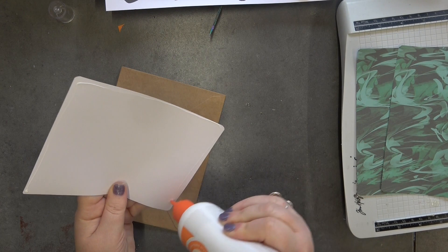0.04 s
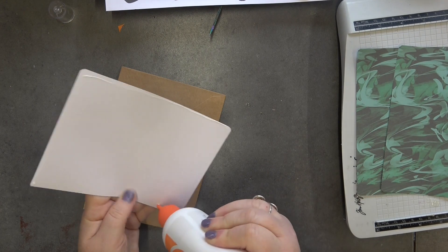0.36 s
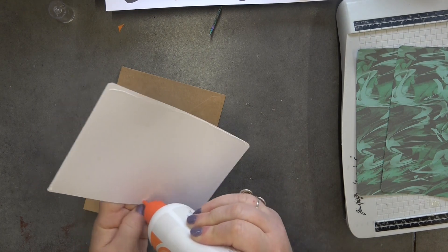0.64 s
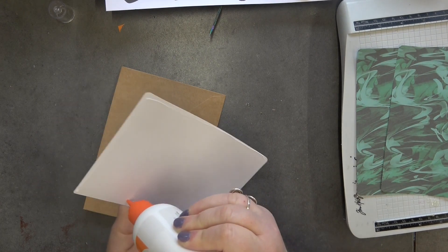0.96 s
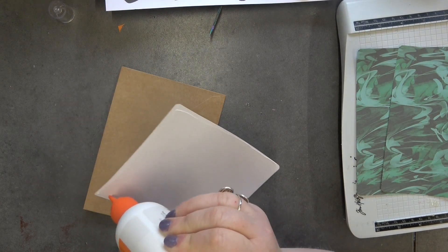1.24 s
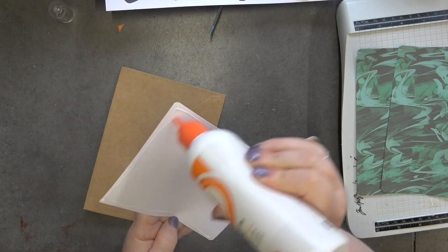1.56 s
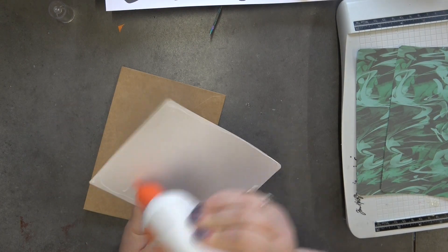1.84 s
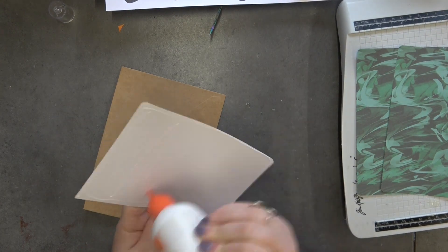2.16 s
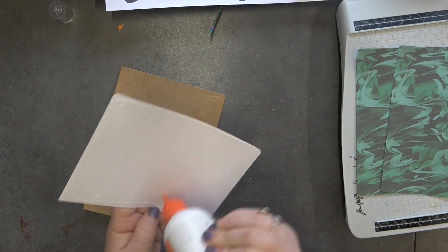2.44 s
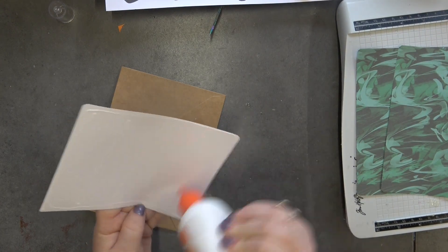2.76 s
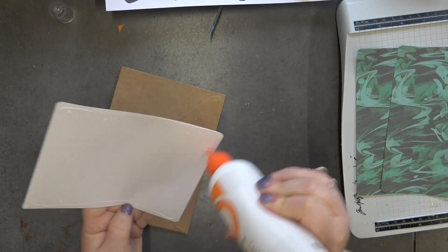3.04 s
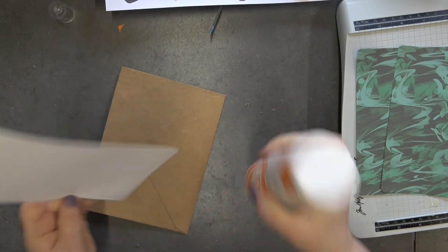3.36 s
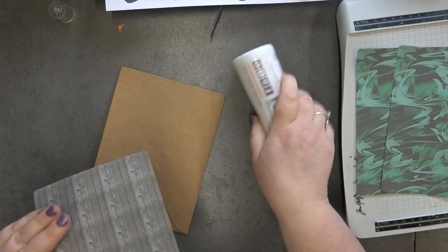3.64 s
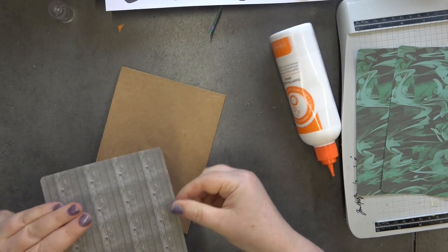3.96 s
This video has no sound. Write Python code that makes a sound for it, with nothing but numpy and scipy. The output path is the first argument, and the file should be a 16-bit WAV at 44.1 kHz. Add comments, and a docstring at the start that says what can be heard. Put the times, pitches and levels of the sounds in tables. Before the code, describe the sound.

A plastic glue bottle nozzle scrapes softly over card in short strokes, after some finger rustling and a sharp flick. The bottle then knocks down on a table and tips over, heard close in a small, quiet room.

```python
"""In a small, quiet room, fingers slide on a hand-held sheet of card and flick its edge as they turn it.
From about 1.4 s the nozzle of a plastic glue bottle rubs over the card in short strokes, close above a
craft table: stick-slip friction hisses and drives the resonances of the sheet. At 3.6 s the bottle
knocks down on the table and excites its modes, rocks, squeaks faintly and tips over with a second clunk."""
import sys
import numpy as np
from scipy import signal
from scipy.fft import rfft, irfft, next_fast_len
from scipy.io import wavfile
from scipy.ndimage import map_coordinates

SR = 44100
rng = np.random.default_rng(int(sys.argv[2]) if len(sys.argv) > 2 else 0)


def to_wav(sig):
    """Store sig (one row per channel, or 1-D mono) as 16-bit WAV at the path in sys.argv[1].

    Samples outside -1..1 are clipped; the rate is SR.
    """
    pcm = np.clip(np.atleast_2d(sig), -1, 1) * 32767
    pcm = np.round(pcm).astype(np.int16)
    wavfile.write(sys.argv[1], SR, pcm.T)  # frames by channels


N = 4 * SR
TOP_HZ = 16000  # upper band limit


def amp(db):
    """Amplitude ratio of a level: 20 dB to a factor of ten."""
    return 10 ** (np.asarray(db) / 20)


def unit(x):
    """Normalisation to rms 1."""
    return x / np.sqrt(np.mean(x ** 2) + 1e-20)


def along(points, hz):
    """Interpolation of (f/Hz, value) points on a logarithmic frequency axis."""
    f, values = np.transpose(points)
    return np.interp(np.log(hz + 1), np.log(f + 1), values)


def filtered(x, response):
    """Linear filtering: the spectrum of x times a frequency response."""
    n = x.shape[-1]
    padded = next_fast_len(n + SR // 4)
    return irfft(rfft(x, padded) * response(np.fft.rfftfreq(padded, 1 / SR)), padded)[..., :n]


def resonances(modes, f):
    """Modal sum of damped oscillators (f/Hz, bandwidth/Hz, level/dB), alternating in sign."""
    return sum((-1) ** k * amp(db) * 1j * f * width / (hz * hz - f * f + 1j * f * width)
               for k, (hz, width, db) in enumerate(modes))


def band(x, hz, width_hz):
    """Two equal resonators in cascade select a band of x; rms 1."""
    b, a = signal.iirpeak(min(hz, TOP_HZ), hz / width_hz, SR)
    return unit(signal.lfilter(b, a, signal.lfilter(b, a, x)))


def split(x, crossover_hz=4460):
    """Complementary filters: the low and high parts sum to x."""
    low = filtered(x, lambda f: 1 / (1 + (f / crossover_hz) ** 4))
    return low, x - low


def add(track, onset, x):
    """Superposition of x on the track from onset/s."""
    i = round(onset * SR)
    track[i:i + len(x)] += x[:max(0, N - i)]


def friction(response, slips_per_s, spread_db, hiss):
    """Stick-slip friction: random impulses of uneven size over smooth hiss, filtered; rms 1."""
    slips = (rng.random(N) < slips_per_s / SR) * rng.standard_normal(N)
    slips *= amp(spread_db * rng.standard_normal(N))
    return unit(filtered(unit(slips) + hiss * rng.standard_normal(N), response))


def speed(start, fastest, end):
    """Relative sliding speed: quarter sines from 0 to 1 and back."""
    ramp = np.interp(np.arange(N) / SR, [start, fastest, end], [0, 1, 0])
    return np.sin(np.pi / 2 * ramp)


def wandering(x, patch_hz=330.3, patch_s=0.05):
    """Coupling to the modes varies as the contact moves: bands swell and fade at random; rms 1."""
    hz, t, spectrum = signal.stft(x, SR, nperseg=512)
    grid = np.meshgrid(hz / patch_hz, t / patch_s, indexing="ij")
    field = map_coordinates(rng.standard_normal((160, 240)), grid, mode="mirror")
    depth_db = 3.3 / np.hypot(1, hz / 7000)[:, None]
    return unit(signal.istft(spectrum * amp(depth_db * field), nperseg=512)[1][:N])


def burst(response, t60, rise_s):
    """A damped transient: coloured noise rises, then decays by 60 dB in t60/s."""
    t = np.arange(SR // 5) / SR
    noise = unit(filtered(rng.standard_normal(len(t)), response))
    return noise * 1000 ** (-t / t60) * (1 - np.exp(-t / rise_s))


def placed(x, pan, wet_db, width):
    """Direct sound plus reverberation; a level difference between the channels gives direction."""
    # reverberation time of the room: f/Hz, T60/s
    decay = [(100, 0.36), (500, 0.12), (3000, 0.2), (12000, 0.13)]
    hz, t, spectrum = signal.stft(rng.standard_normal((2, SR // 3)), SR, nperseg=256)
    mid, side = signal.istft(spectrum * amp(-60 * t / along(decay, hz)[:, None]), SR, nperseg=256)[1]
    tail = np.array([mid + width * side, mid - width * side]) / np.linalg.norm(mid)
    delayed = np.pad(x, (SR // 200, 0))
    wet = signal.fftconvolve(delayed[None], tail, axes=1)[:, :N]
    return filtered(x + amp(wet_db) * wet, lambda f: amp(along(pan, f) * np.array([[0.5], [-0.5]])))


def room_tone():
    """Stationary air noise, highly correlated between the channels."""
    # background spectrum: f/Hz, relative level/dB
    air = [(22, 0), (50, 0), (130, -1), (170, -0.5), (205, -2), (260, -5.5), (360, 0), (425, -5.5),
           (495, -2), (560, -5.5), (780, -2), (1000, -5), (1080, 0.5), (1220, -11), (1290, -0.5),
           (1430, -14.5), (1650, -13.5), (2100, -18), (4000, -21.5), (6300, -19.5), (10000, -26),
           (13000, -24.5), (16000, -29)]
    mid, side = unit(filtered(rng.standard_normal((2, N)), lambda f: amp(along(air, f))))
    return amp(-54.5) * (mid + amp(-12) * np.array([side, -side]))


def squeaks():
    """Stick-slip drives two narrow resonances as the plastic bottle tips."""
    # slides of the plastic: start t/s, fastest t/s, end t/s, level/dB
    slides = [(3.807, 3.824, 3.832, -55), (3.836, 3.832, 3.856, -57)]
    # squeak resonances, applied twice: f/Hz, bandwidth/Hz, level/dB
    modes = [(2560, 170, 0.5), (3990, 110, -0.5)]
    slip = friction(lambda f: resonances(modes, f) ** 2, slips_per_s=540, spread_db=3, hiss=0.3)
    return slip * sum(amp(db) * speed(*times) for *times, db in slides)


def fingers():
    """Sliding friction of skin: a hiss on the card's face and a rasp on its edge grow with speed."""
    # glides on the face: start t/s, fastest t/s, end t/s, level/dB, sibilance level/dB, sibilance f/Hz
    glides = [(-.1, 0.013, 0.094, -59.5, -67, 5600), (0.253, .31, 0.48, -62, -67, 2940),
              (0.334, 0.406, 0.525, -53.5, -50.5, 5530), (0.445, 0.485, 0.517, -61, -53, 5300),
              (0.542, 0.604, 0.73, -63.5, -65, 2670), (3.14, 3.34, 3.597, -51.5, -67, 7750),
              (3.418, 3.52, 3.81, -55, -80, 12000)]
    # friction spectrum of the face: f/Hz, relative level/dB
    face = [(900, 6), (1700, 1), (2700, -0.5), (4000, -1), (6000, -4), (9000, -5), (11000, -10),
            (13500, -11), (16000, -26)]
    # drags on the edge: start t/s, fastest t/s, end t/s, level/dB, relative treble level/dB
    drags = [(0.34, 0.443, 0.59, -55, -10), (0.732, 0.78, 0.88, -41, 1.5), (0.823, 0.859, 0.96, -44.5, -3),
             (0.937, 0.97, 1.12, -47.5, -10), (1.085, 1.135, 1.23, -55.5, -4)]
    # friction spectrum of the edge: f/Hz, relative level/dB
    edge = [(180, -48), (300, -13.5), (774, 0), (1970, 0), (2170, -9.5), (2700, -6.5), (3240, -6),
            (6960, -15), (14500, -26), (16000, -52)]
    rub = wandering(friction(lambda f: amp(along(face, f)), slips_per_s=4000, spread_db=2.5, hiss=1.2))
    rasp = wandering(friction(lambda f: amp(along(edge, f)), slips_per_s=2500, spread_db=2.5, hiss=0.9))
    low, high = split(rasp)
    out = np.zeros(N)
    for *times, db, sibilance_db, hz in glides:
        sibilance = band(rng.standard_normal(N), hz, 0.3 * hz)
        out += speed(*times) * (amp(db) * rub + amp(sibilance_db) * sibilance)
    for *times, db, treble_db in drags:
        out += amp(db) * speed(*times) ** 1.1 * (low + amp(treble_db) * high)
    return out


def snaps():
    """Impulsive excitation of the card: a bright snap of the edge and a duller flap of the sheet."""
    # flicks and taps: t/s, snap level/dB, snap f/Hz, flap level/dB, flap f/Hz
    flicks = [(.51, -46, 3000, -39, 620), (0.744, -40.5, 8950, -63, 1510), (.7828, -35, 5550, -44, 1190),
              (.787, -20.5, 9000, -31, 1550), (.7955, -29.5, 4240, -51, 1300),
              (.834, -40.5, 4500, -35.5, 920), (0.9432, -46.5, 6000, -38, 1630),
              (0.986, -44.5, 6500, -61, 1500), (2.178, -41, 3000, -30.5, 417),
              (2.534, -45, 3500, -45, 1150), (3.1092, -46, 3500, -28, 930), (3.128, -54, 3553, -37, 1120),
              (3.212, -35, 3770, -28.5, 1002), (3.3116, -33, 8000, -30, 545),
              (3.603, -44.5, 3500, -24.5, 633), (3.857, -46.5, 6930, -44, 600)]
    out = np.zeros(N)
    for onset, snap_db, snap_hz, flap_db, flap_hz in flicks:
        edge, sheet = [(snap_hz, 3000, 0)], [(flap_hz, 0.45 * flap_hz, 0)]
        snap = burst(lambda f: resonances(edge, f) / (1 + (f / 11100) ** 6), t60=0.018, rise_s=0.00028)
        flap = burst(lambda f: resonances(sheet, f) ** 2, t60=0.027, rise_s=0.0013)
        add(out, onset, amp(snap_db) * snap + amp(flap_db) * flap)
    return out


def bottle():
    """Each impact gives a hollow thud, a plastic clack and free, damped vibration of table and bottle."""
    # impacts: t/s, thud level/dB, thud f/Hz, thud length/s,
    # ring level/dB, clack level/dB, clack cutoff f/Hz, clack rise/s
    impacts = [(3.6262, -2.5, 432, 0.00493, -33, -13, 1570, 0.0011),
               (3.6864, -11, 420, 0.0057, -31, -30.5, 2300, 0.00046),
               (3.708, -16.5, 240, 0.0088, -25.5, -16.5, 1760, 0.0011),
               (3.744, -18, 444, 0.00624, -31, -26.5, 2170, 0.0004),
               (3.923, -15, 673, 0.0119, -27.5, -15.5, 2500, 0.0038),
               (3.944, -9.5, 535, 0.0053, -19.5, -21, 700, 0.0016)]
    # modes of table and bottle: f/Hz, relative level/dB, T60/s
    modes = [(56.6, -5.5, 0.89), (120, -7.5, 0.19), (175, -5, 0.25), (215, -9, .1), (260, -7, .1),
             (318.6, 0, 0.12), (415, -12, 0.082), (508, -20, .09), (669, -6.5, 0.17), (774, 0, .12),
             (1146, -8, .09), (1347, -3, 0.069), (1646, -12, 0.099), (1833, -22, 0.056)]
    # clack spectrum: f/Hz, relative level/dB
    plastic = [(200, -2), (700, 2.5), (980, -0.5), (1350, 4), (1750, 1.5), (2100, -5.5), (2400, -3.5),
               (2900, -3), (3600, -7), (4900, -5), (6500, -7), (8000, -8), (9600, -9), (11000, -13.5),
               (13000, -14), (16000, -23)]
    # early reflections from near surfaces: delay/s, amplitude ratio
    walls = [(.0072, 0.44), (.0093, 0.48), (0.0117, 0.28), (0.0186, 0.27), (.0315, .15), (.0395, 0.13)]
    out, t = np.zeros(N), np.arange(SR // 2) / SR
    for onset, thud_db, thud_hz, length, ring_db, clack_db, clack_hz, rise_s in impacts:
        pulse = np.sin(np.pi * np.minimum(t / length, 1))
        add(out, onset, amp(thud_db) * pulse * np.cos(2 * np.pi * thud_hz * (t - length / 2)))
        draws = rng.standard_normal((len(modes), 2))
        ring = sum(amp(db + 2 * scatter - 60 * t / t60) * np.sin(2 * np.pi * (hz * t + phase))
                   for (hz, db, t60), (scatter, phase) in zip(modes, draws))
        add(out, onset, amp(ring_db - 3) * ring * (1 - np.exp(-t / 0.0014)))
        clack = burst(lambda f: amp(along(plastic, f)) / np.hypot(1, f / clack_hz), 0.039, rise_s)
        add(out, onset, amp(clack_db) * clack)

    def reflections(f):
        """Delayed copies from surfaces that return little above 1060 Hz."""
        return sum(gain * np.exp(-2j * np.pi * f * delay) for delay, gain in walls) / (1 + (f / 1060) ** 2)

    # keeps the knocks free of deep rumble below 69 Hz
    low_cut = signal.butter(2, 69, "high", fs=SR, output="sos")
    return signal.sosfilt(low_cut, out + filtered(out, reflections))


def nozzle():
    """Forced vibration: the tip slips over fibres; faster is louder, brighter and drives higher modes."""
    # strokes: start t/s, fastest t/s, end t/s, scrape level/dB, body level/dB,
    # treble level/dB relative to the scrape, ring level/dB, ring f/Hz (the mode excited most)
    strokes = [(1.442, 1.504, 1.5, -63.5, -59.5, 14.5, -77, 2970),
               (1.546, 1.584, 1.658, -47.5, -52.5, 5, -49, 1620),
               (1.657, 1.681, 1.91, -47, -49.5, 4.5, -60, 2080),
               (1.832, 1.981, 2.028, -41.5, -49.5, 1, -46, 1750),
               (2.029, 2.058, 2.2, -43.5, -49, 3.5, -53, 2950),
               (2.124, 2.164, 2.234, -50.5, -49.5, 3.5, -56, 3060),
               (2.212, 2.246, 2.392, -41, -48.5, 2.5, -51, 2430),
               (2.345, 2.441, 2.537, -43, -51, -2, -51, 2370),
               (2.474, 2.566, 2.65, -49.5, -51.5, -2, -59, 2810),
               (2.577, 2.628, 2.715, -46.5, -51.5, -13, -52, 2460),
               (2.688, 2.789, 2.78, -45.5, -47, -5, -53, 2800),
               (2.773, 2.811, 2.906, -41, -49, -0.5, -49.5, 3180),
               (2.902, 2.925, 3.11, -49, -51.5, -2.5, -59, 3530),
               (3.073, 3.193, 3.3, -53.5, -49, 1, -58.5, 1470)]
    # scrape spectrum, lower part: f/Hz, relative level/dB
    scrape_low = [(100, -78), (400, -7), (900, -12.5)]
    # scrape spectrum, upper part: f/Hz, relative level/dB
    scrape_high = [(820, -31), (1400, 5.5), (1530, -2), (1720, -3), (2280, -2.5), (2740, -4), (3160, -2.5),
                   (4610, -6), (7530, -8), (13500, -24.5), (16000, -31)]
    # upper modes of the card: f/Hz, bandwidth/Hz, level/dB
    upper_modes = [(1753, 160, 0.5), (2240, 210, 1), (3130, 380, -3.5), (5190, 380, -5), (6050, 200, -3.5),
                   (8000, 900, -9), (13200, 2000, -18.5)]
    # body modes under a slow tip: f/Hz, bandwidth/Hz, level/dB
    slow_modes = [(890, 330, -1.5), (1188, 180, -0.5), (650, 150, -12.5)]
    # body modes under a fast tip: f/Hz, bandwidth/Hz, level/dB
    fast_modes = [(1070, 145, 11), (1305, 270, -0.5), (1740, 440, -11)]
    spectrum = scrape_low + list(scrape_high[1:])
    rough = friction(lambda f: amp(along(spectrum, f)), slips_per_s=2000, spread_db=-0.5, hiss=0.84)
    ringing = friction(lambda f: resonances(upper_modes, f), slips_per_s=1200, spread_db=0, hiss=0.98)
    low, high = split(wandering(rough + amp(-3.5) * ringing))
    slow = wandering(friction(lambda f: resonances(slow_modes, f), 730, spread_db=1, hiss=0.6))
    fast = wandering(friction(lambda f: resonances(fast_modes, f), 1000, spread_db=2.5, hiss=0.5))
    slips = friction(np.ones_like, slips_per_s=1000, spread_db=2.5, hiss=0.5)
    out = np.zeros(N)
    for *times, db, body_db, treble_db, ring_db, ring_hz in strokes:
        v = speed(*times)
        fast_share = 0.87 * v ** 2  # of the body's power
        body = amp(body_db) * (np.sqrt(1 - fast_share) * slow + np.sqrt(fast_share) * fast)
        scrape = amp(db) * low + amp(ring_db) * band(slips, ring_hz, width_hz=360)
        treble = amp(db + treble_db) * high
        out += body * v ** 0.68 + scrape * v ** 2.18 + treble * v ** 2.7
    # a fine fizz lasts between the strokes
    fizz = friction(lambda f: resonances([(8060, 6100, 0)], f) ** 2, 800, spread_db=2.5, hiss=1.0)
    return out + amp(-63) * speed(start=1.26, fastest=2.32, end=3.15) ** 0.45 * fizz


def scene():
    """Superposition of the card in the hands, the bottle on the table and the room's air."""
    # direction of the card: f/Hz, left minus right level/dB
    card_pan = [(60, 16), (180, 17), (550, 1.0), (1650, 0), (4970, 2.5), (15000, 3)]
    # direction of the table: f/Hz, left minus right level/dB
    table_pan = [(60, -4), (150, 5.5), (380, -4), (950, 1), (2380, 1), (5980, 1.5), (15000, 3)]
    card = placed(nozzle() + fingers() + snaps(), card_pan, wet_db=-9.5, width=0.19)
    table = placed(bottle() + squeaks(), table_pan, wet_db=-7.5, width=0.2)
    return card + table + room_tone()


def record(dry):
    """The microphone acts as a steep low-pass filter at its band limit."""
    return filtered(dry, lambda hz: 1 / np.hypot(1, (hz / TOP_HZ) ** 80))


dry = scene()
out = record(dry)
to_wav(out)
```